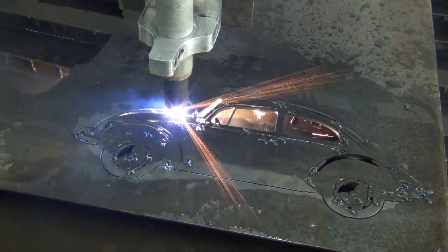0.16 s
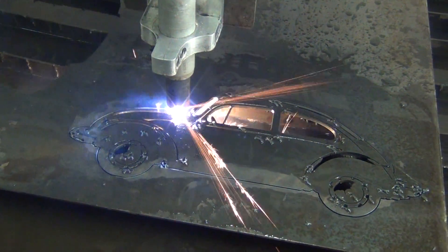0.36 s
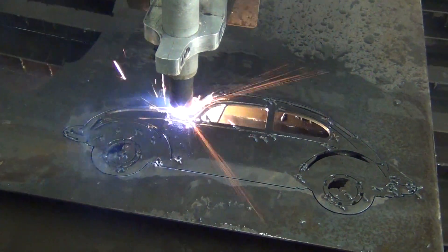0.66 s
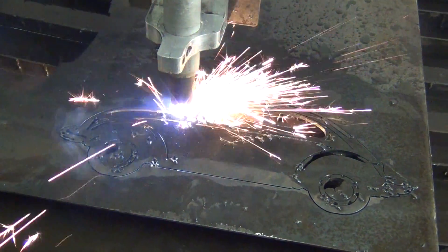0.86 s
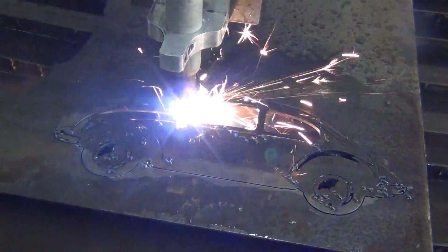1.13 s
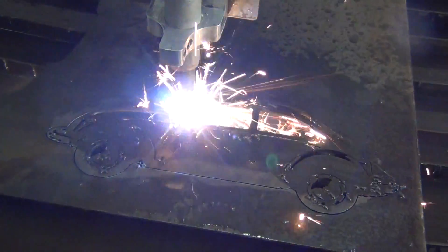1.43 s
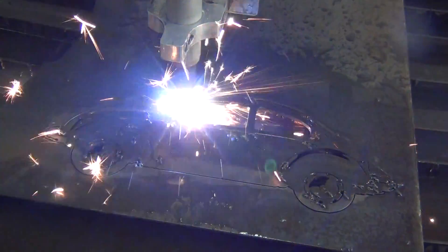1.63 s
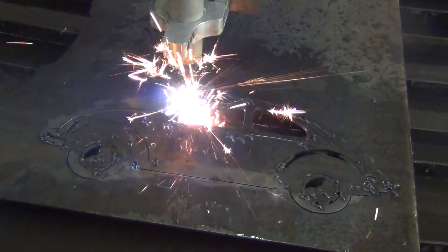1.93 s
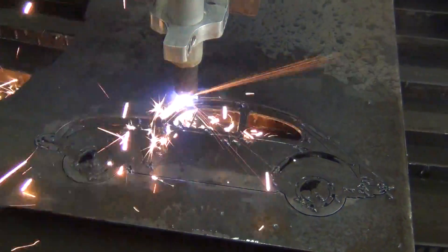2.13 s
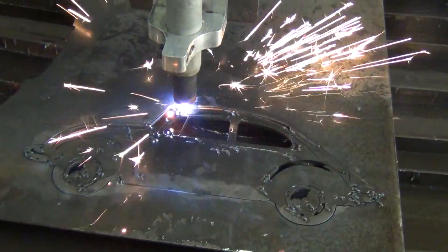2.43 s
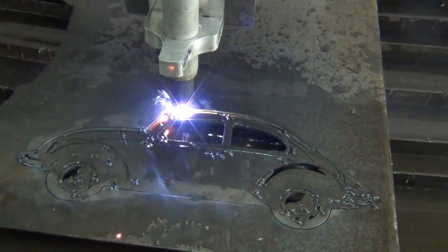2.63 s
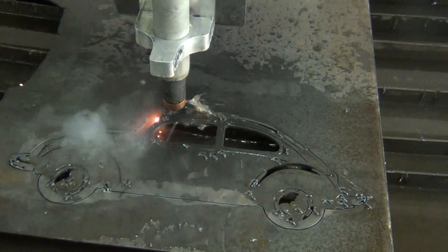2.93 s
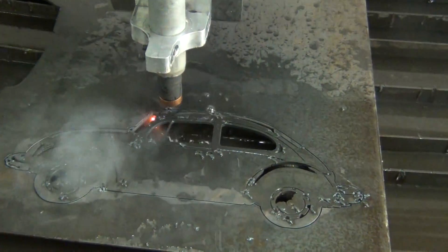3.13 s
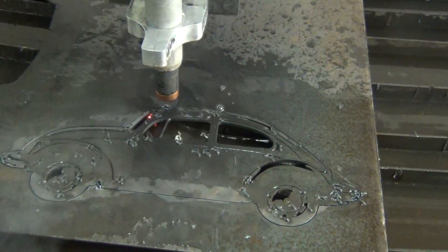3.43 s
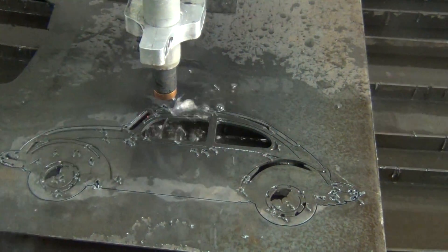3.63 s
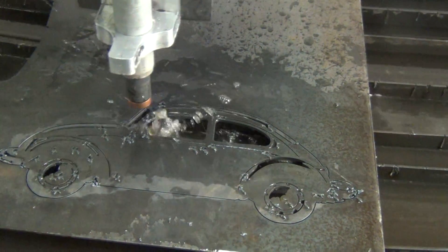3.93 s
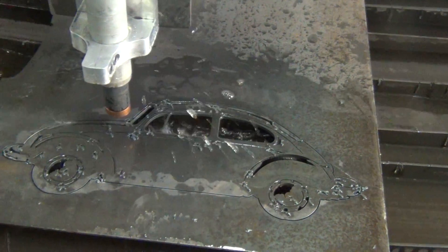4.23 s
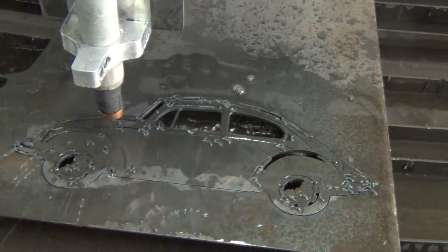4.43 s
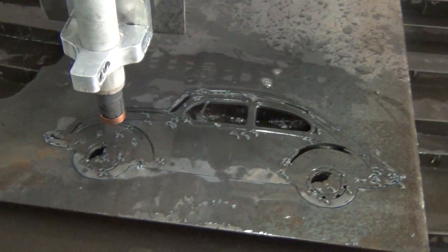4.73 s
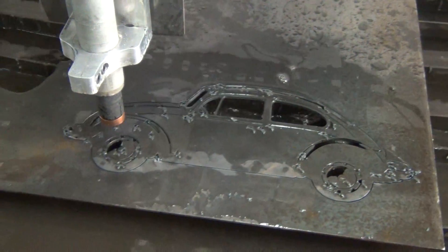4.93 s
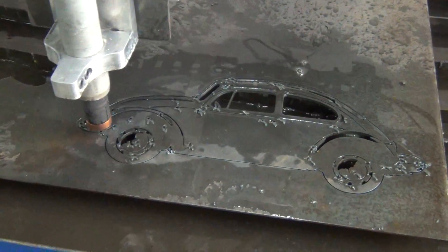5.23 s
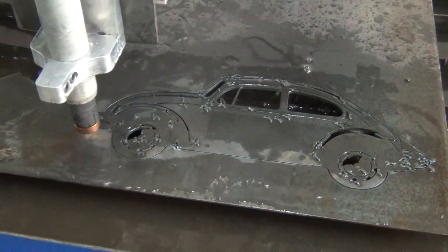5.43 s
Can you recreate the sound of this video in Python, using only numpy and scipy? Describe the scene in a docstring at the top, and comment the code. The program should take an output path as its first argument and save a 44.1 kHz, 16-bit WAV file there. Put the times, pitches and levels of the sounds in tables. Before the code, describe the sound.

Strong, high, turbulent hiss runs throughout. For the first two and a half seconds a grainy arc roar and spitting slag sit under it, growing rougher after one second. Wet gurgles, steam spurts and bubble gulps follow with a faint ringing of the plate. Then the roar drops out, a short electric whine lifts the torch, and the hiss travels over wet metal with a soft hollow hoot. Near microphones, two similar channels, low workshop hum.

```python
"""Plasma torch cutting steel over a water table

A workshop, heard in two nearly alike channels: an air jet, shaped noise with moving humps, hisses throughout.
The arc roars as noise ringing in kerf resonances; slag rasps and cracks; blown water rings in rising bubbles.
As the cut closes, gliding resonances gurgle and spurt, large bubbles gulp and the plate sings; pulses pop.
The arc stops, a stepper whines as it lifts the torch, and the gantry hums off with air still blowing on wet plate."""
import sys
import numpy as np
from scipy import signal
from scipy.fft import rfft, irfft, next_fast_len
from scipy.io import wavfile

SR = 44100
rng = np.random.default_rng(int(sys.argv[2]) if len(sys.argv) > 2 else 0)


def unload_audio(sound):
    """Save the sound as a 16-bit wav file, at the path given as the first command line argument."""
    columns = np.transpose(np.atleast_2d(sound))
    # keep every value between -1 and 1, then stretch to whole-number steps
    steps = np.round(np.clip(columns, -1, 1) * 32767)
    wavfile.write(sys.argv[1], SR, steps.astype(np.int16))


N = 245623
TIME = np.arange(N) / SR
FRAME = 512  # samples

# Levels are at the source, ahead of tank and channel filters. A "spread" is the standard deviation of a bell.

# Turbulent mixing noise of the jet, under its humps. Each row: frequency in Hz, level in dB per Hz.
MIXING = [(120, -82.5), (300, -96.5), (700, -88), (1500, -77.5), (2400, -73.5), (3000, -72), (3600, -72),
          (4400, -67.5), (6000, -61), (7500, -62.5), (9000, -64), (11000, -60.5), (13000, -62.5),
          (14500, -69.5)]
# Peaks and dips of the gap between torch and plate. Each row: centre in Hz, spread in Hz, change in dB.
GAP = [(2720, 60, 1.8), (3450, 210, 1.5), (3840, 76, 2), (4170, 66, -4), (4290, 116, 5), (5100, 70, -2.5),
       (5410, 112, 4), (5610, 138, -7.5), (5760, 71, 4.5), (6200, 61, 3), (6970, 90, -2), (9630, 99, -1.5),
       (10400, 210, -0.5), (12700, 170, -1), (15200, 300, -0.5)]
# Strength of the air jet. Each row: time in seconds, change in dB.
AIR = [(0, -1.5), (1.0, -1.4), (1.6, -1.3), (2.2, -2), (2.8, -0.8), (3.3, 1.65), (4.1, 0.25), (4.8, 0.5),
       (5.57, 0)]
# How strongly eddies stir each part of the hiss. Each row: frequency in Hz, rms swing in dB.
EDDIES = [(500, 3.5), (2500, 1.5), (4500, 1), (7000, 1.0), (10000, 0.28), (14000, 1.1)]
# The jet's broad humps, blowing into the kerf. Each row: centre in Hz, spread in Hz, height in dB.
HUMPS_IN_KERF = [(5110, 720, 4.5), (10120, 1015, 12), (13800, 520, 1.5), (15300, 350, -0.5)]
# The same humps, blowing from a height onto the plate. Each row: centre in Hz, spread in Hz, height in dB.
HUMPS_ON_PLATE = [(4450, 850, 3), (10590, 950, 7.5), (12400, 520, 3.5), (14950, 300, 0.5)]
# Dip from the plate's reflection. Each row: time in seconds, centre in Hz, depth in dB, spread in Hz.
REFLECTION = [(0, 7680, 8, 540), (1.0, 7700, 6.5, 540), (1.5, 7950, 7, 640), (1.9, 8450, 6.5, 720),
              (2.2, 7850, 8, 650), (2.5, 7400, 4, 600), (3.2, 6840, 7.5, 470), (3.6, 6400, 5.5, 520),
              (4.1, 5950, 4.5, 520), (4.6, 5900, 6.5, 450), (5.0, 6150, 5.5, 450), (5.57, 6400, 7.5, 398)]
# Parts of the hiss that swell or hollow out for a moment as the nozzle travels.
# Each row: middle in seconds, spread in seconds, centre in Hz, spread in Hz, change in dB.
SWELLS = [(1.25, 0.18, 13450, 250, 4), (1.5, .17, 15350, 350, 5), (1.98, 0.29, 11960, 450, 6.5),
          (2.22, .16, 15300, 450, 4), (2.78, 0.11, 4850, 250, -5), (3.05, .3, 15500, 300, -4.5),
          (3.2, 0.3, 10200, 280, -4), (3.2, .3, 9300, 250, 0.5), (3.45, 0.18, 2760, 200, -3.5),
          (4.25, .25, 14500, 300, -5), (4.95, .25, 13300, 160, 3.5), (5.1, .3, 14900, 220, 5),
          (5.55, 0.26, 12400, 800, -1)]
# Power supply and fans. Each row: pitch in Hz, level in dB, left minus right in dB.
HUM = [(65.4, -68.5, 7), (98.4, -64.5, 8), (119.2, -56, 3.5), (381.4, -64, 5)]
# Background rumble of the workshop. Each row: frequency in Hz, level in dB per Hz.
SHOP = [(20, -105), (40, -132), (62, -96), (80, -79), (115, -82.5), (150, -86), (240, -84), (420, -86),
        (1000, -107), (3000, -100)]
# Faint draught, opposite in the two channels. Each row: frequency in Hz, level in dB per Hz.
DRAUGHT = [(15, -79), (30, -77), (55, -77), (90, -83), (200, -87), (450, -93), (900, -104), (1500, -125)]
# Arc roaring in the kerf. Each row: time in seconds, level in dB before roar_db.
ARC = [(0, -34.5), (0.8, -33.5), (0.9, -35.5), (1.08, -34.5), (1.14, -31.5), (1.46, -32.5), (1.55, -30),
       (1.97, -31), (2.01, -33), (2.12, -40.5), (2.3, -43), (2.48, -38), (2.53, -35), (2.62, -31)]
# Kerf resonances. Each row: centre in Hz, width in Hz, relative level in dB, extra dB while the kerf runs clean.
KERF = [(637.6, 150, -10, 0), (1020, 133, -4.5, 1.5), (1433, 53, -10, -2), (1687, 240, -1, -1),
        (1866, 42, -6, -0.5), (2000, 190, -2, 0.5), (2610, 490, -4, 2)]
# Slag blown back out of the cut. Each row: peak in seconds, level in dB, spread in seconds.
BLOWBACK = [(1.14, -48, .06), (1.85, -35.5, 0.3), (2.164, -33, 0.06), (2.56, -35, 0.14)]
# Colour of the slag's coarse rasp. Each row: frequency in Hz, relative level in dB.
RASP = [(120, 14), (300, -3.5), (700, 5), (1300, -16), (2600, 3.5), (3400, 10), (4500, -18), (6500, 7),
        (10000, 2), (15000, -22)]
# Water churned by the jet. Each row: time in seconds, level in dB, typical bubble pitch in Hz.
CHURN = [(0, -49.5, 380), (2.1, -52, 397), (2.45, -41.5, 650), (2.85, -38, 704), (3.2, -44.5, 765),
         (3.72, -45.5, 676), (3.82, -46, 1350), (5.2, -46, 1420), (5.57, -67, 1300)]
# Loudest spurts of steam and water.
# Each row: start in seconds, level in dB before level_db, start pitch in Hz, end pitch in Hz, length in seconds.
SPURTS = [(1.122, -34.5, 460, 300, 0.022), (1.8, -27, 2650, 3040, 0.034), (1.871, -23, 1880, 1800, 0.018),
          (1.924, -22.5, 1953, 1576, 0.026), (1.967, -21.5, 1905, 1740, .016),
          (2.275, -27, 2750, 3270, 0.041), (2.382, -25, 2480, 3210, 0.023),
          (2.504, -19.5, 1960, 1730, 0.014), (2.54, -30, 3300, 3050, 0.024),
          (2.735, -28.5, 3230, 3400, 0.021), (2.792, -27, 890, 690, 0.011), (2.798, -25, 1670, 1490, 0.01),
          (2.82, -31, 1680, 1620, 0.015), (2.917, -33, 870, 640, 0.032), (3.04, -32, 1890, 2400, 0.026),
          (3.058, -33.5, 888, 724, 0.062), (3.18, -40, 1047, 705, 0.07), (3.46, -38, 987, 880, 0.05),
          (3.523, -35.5, 1770, 1250, 0.049), (3.69, -38, 650, 1050, 0.049),
          (3.792, -33.5, 1682, 1375, 0.03), (3.89, -38, 1414, 1555, 0.042),
          (3.975, -32.5, 1500, 1756, 0.035), (4.008, -32, 1656, 1404, 0.031),
          (4.28, -42, 1596, 1250, 0.042)]
# Steam pops. Each row: middle in seconds, peak in dB, time from middle to peak in seconds.
POPS = [(1.9353, -14, 0.000073), (2.7473, -18, 0.00021), (2.8018, -12, 0.00028)]
# Ringing modes of the plate. Each row: centre in Hz, width in Hz, relative level in dB.
PLATE = [(325, 56, -9.5), (456, 15, -7.5), (640, 46, -2.5), (1696, 89, 0), (3120, 82, -4)]
# Gas pocket shrinking and swelling under the closing cut. Each row: time in seconds, pitch in Hz, level in dB.
GURGLE = [(2.31, 1750, -55), (2.323, 1730, -32), (2.37, 1750, -42), (2.412, 2150, -43), (2.432, 1895, -28),
          (2.446, 1700, -26.5), (2.462, 2130, -32), (2.48, 2330, -31.5), (2.51, 2470, -37),
          (2.59, 2400, -47), (2.63, 2600, -38), (2.652, 1578, -30), (2.668, 749, -28), (2.7, 600, -43),
          (2.712, 1900, -44), (2.725, 1950, -32), (2.748, 1360, -35), (2.76, 1000, -45), (2.79, 850, -48)]
# Single large bubbles. Each row: start in seconds, peak in dB, pitch in Hz, swell time in seconds.
GULPS = [(2.541, -29.5, 1180, .005), (2.591, -26.5, 650, .003), (2.657, -22, 1010, 0.0023),
         (2.663, -19, 652, 0.0029), (2.675, -20, 947, 0.0021), (2.683, -28, 422, .004),
         (2.746, -22.5, 621, 0.0024), (2.764, -32, 900, 0.0034), (2.783, -25, 657, 0.0024),
         (2.8, -23.5, 720, .0025), (2.803, -26, 305, 0.0045), (2.81, -20, 510, 0.0026),
         (2.819, -26.5, 420, .003), (2.929, -30.5, 618, 0.0037), (3.5, -37, 323, 0.0043),
         (3.645, -41, 720, 0.0074), (3.693, -39, 334, 0.0038), (3.795, -32.5, 1830, .005),
         (3.798, -33, 2060, 0.0046), (4.036, -35, 717, 0.0067)]
# Surges of the stepper's whine. Each row: start in seconds, end in seconds, level in dB.
SURGES = [(3.04, 3.13, -41), (3.146, 3.276, -42), (3.322, 3.424, -40)]
# Gantry motors. Each row: pitch in Hz, level in dB, start in seconds.
GANTRY = [(197, -64, 3.5), (232, -61.5, 3.45), (474, -63, 3.64), (730, -62, 4.7)]
# Resonances and dips of the slatted water table. Each row: centre in Hz, spread in Hz, change in dB.
TANK = [(235, 31, -1.5), (322, 23, 1), (400, 25, 0), (554, 108, -5), (623, 18, 3), (1008, 31, -0.5),
        (1600, 55, 2.5), (1800, 32, -1.5), (3160, 41, 3), (4370, 83, 10)]
# How the two channels differ.
# Each row: frequency in Hz, left minus right in dB, lead of the left in radians, likeness from 0 to 1.
STEREO = [(60, 3, 0, .4), (130, 2.5, 0, .65), (280, -1, 0, .87), (450, -3.3, 0, .84), (660, -.8, 0, .965),
          (950, -.3, 0, .982), (1250, 0, 0, .9993), (4600, 0, 0, .9995), (5600, .6, .09, .985),
          (6600, .4, .14, .97), (7700, 2.5, .5, .83), (8450, 6, .4, .65), (9000, 4.8, -.4, .85),
          (9900, 1, -.24, .985), (11200, .5, -.08, .996), (12300, .1, 0, .998), (14500, .1, 0, .992)]
CUTOFF_HZ = 15800

CUT_THROUGH_S = 2.1  # the cut closes
THROUGH_TOP_HZ, THROUGH_TOP_DB = 250, 2.5  # the third hump then rises in pitch and level
LEAVE_KERF_S, LEAVE_TAKES_S = 3.1, 0.26  # middle and time constant of the nozzle leaving the kerf
LIFT_SAG_HZ, LIFT_SAG_DB, LIFT_SAG_SPREAD_S = 520, 1, 0.19  # the main hump sags while the torch rises
OUTSKIRTS_S, OUTSKIRTS_LOSS_DB_PER_S = 4.82, 5.5  # the low hump fades near the end of the plate
# the lifted jet atomises water, a high hiss that sinks in pitch
SPRAY_S, SPRAY_SPREAD_S, SPRAY_DB = 3.53, 0.8, 2.5
SPRAY_HZ, SPRAY_WIDTH_HZ, SPRAY_SINK_HZ_PER_S = 12600, 550, 1300
ARC_OUT_S, ARC_FADE_DB_PER_S = 2.58, 63
CHOKE_S, CHOKE_TAKES_S = 1.11, 0.025  # slag begins to choke the kerf
SLAG_STEADY_DB = -46.5  # between bursts, while the arc burns
# smaller spurts at random after the cut closes, weakening and tending lower
SPUTTER_FROM_S, SPUTTER_TO_S, SPUTTER_LENGTH_S = 2.36, 3.75, 0.0254
SPUTTER_DB, SPUTTER_FADE_DB_PER_S = -33, 5.5  # before level_db of the spurts
SPUTTER_FIRST_HZ, SPUTTER_LAST_HZ, SPUTTER_SINK_S = 2356, 745, 0.4
SINGING_FROM_S, SINGING_TO_S, SINGING_EDGE_S, SINGING_DB = 2.01, 3.16, 0.32, -45
# the torch lift: middle and half length of the full-speed run, top step rate, ramp
LIFT_S, LIFT_HALF_S, STEP_HZ, RAMP_HZ_PER_S = 3.228, 0.182, 1347, 6000
SURGE_EDGE_S, WHINE_DB = 0.02, -54  # the whine is faint between its surges
RAMP_DB, RAMP_LOSS_DB_PER_S = -48, 100  # and fades away from the run along both ramps
# the carriage shudders with the lift and settles
SHUDDER_S, SHUDDER_RISE_S, SHUDDER_DB, SHUDDER_FADE_DB_PER_S, CARRIAGE_HZ = 3.05, 0.097, -42.5, 27, 63
# the hoot of the hollow under the cut-outs is loudest over their middle and sinks as the nozzle moves on
HOLLOW_FROM_S, HOLLOW_PEAK_S, HOLLOW_SPREAD_S = 3.4, 5.12, 0.41
HOOT_DB, HOOT_HZ, HOOT_SINK_HZ_PER_S = -47, 722, 98


def from_db(db):
    """Decibels to gain."""
    return 10 ** (np.asarray(db) / 20)


def rms_one(x):
    """Scale to unit power."""
    return x / np.sqrt(np.mean(np.abs(x) ** 2) + 1e-20)


def in_time(rows, at=TIME):
    """Each column of a curve, joined by straight lines."""
    s, *columns = np.transpose(rows)
    return [np.interp(at, s, column) for column in columns]


def at_hz(rows, hz):
    """Each column of a spectrum, joined on a log-frequency axis."""
    points, *columns = np.transpose(rows)
    return [np.interp(np.log(hz + 1), np.log(points), column) for column in columns]


def hump(x, centre, spread):
    """A bell of height 1, in frequency or in time."""
    return np.exp(-0.5 * ((x - centre) / spread) ** 2)


def gate(start_s, end_s, edge_s):
    """Rise, hold at 1, fall."""
    return np.clip(np.minimum(TIME - start_s, end_s - TIME) / edge_s, 0, 1)


def drift(rate, count=N):
    """Smooth random wandering of spread 1, up to about `rate` changes a second."""
    hz = np.fft.rfftfreq(next_fast_len(count + SR // 10), 1 / SR)
    spectrum = rfft(rng.standard_normal(2 * len(hz) - 2)) / (1 + (hz / rate) ** 2)
    return rms_one(irfft(spectrum))[:count]


def resonance(hz, width_hz, count=N):
    """Turbulence ringing in one resonance, whose centre may glide; rms about 1."""
    phase = 2 * np.pi * np.cumsum(hz * np.ones(count)) / SR
    in_phase = drift(width_hz * 0.65, count) * np.cos(phase)
    return in_phase + drift(width_hz * 1.24, count) * np.sin(phase)


def tone(hz, waver_hz=0.68):
    """A machine line that wavers slightly in pitch; rms 1."""
    return np.sqrt(2) * np.sin(2 * np.pi * np.cumsum(hz + waver_hz * drift(6.9)) / SR)


def coloured(x, spectrum):
    """Give unit white noise a spectrum in dB per Hz."""
    size = next_fast_len(N + FRAME)
    gain = from_db(at_hz(spectrum, np.fft.rfftfreq(size, 1 / SR))[0])
    return irfft(rfft(x, size) * gain, size)[..., :N] * np.sqrt(SR / 2)


def jet_humps(s, closing_s=0.15):
    """Jet humps over time (Hz, spread Hz, dB), moved by the closing cut, rising torch and travelling nozzle."""
    away = 0.5 + 0.5 * np.tanh((s - LEAVE_KERF_S) / (2 * LEAVE_TAKES_S))
    through = (0.5 + 0.5 * np.tanh((s - CUT_THROUGH_S) / closing_s)) * (1 - away)
    rising = hump(s, LIFT_S, LIFT_SAG_SPREAD_S)
    in_kerf = np.multiply.outer(HUMPS_IN_KERF, 1 - away)
    low, main, top, highest = in_kerf + np.multiply.outer(HUMPS_ON_PLATE, away)
    low = (low[0], low[1], low[2] - OUTSKIRTS_LOSS_DB_PER_S * np.maximum(s - OUTSKIRTS_S, 0))
    main = (main[0] - LIFT_SAG_HZ * rising, main[1], main[2] - LIFT_SAG_DB * rising)
    top = (top[0] + THROUGH_TOP_HZ * through, top[1], top[2] + THROUGH_TOP_DB * through)
    spray_hz = SPRAY_HZ - SPRAY_SINK_HZ_PER_S * (s - SPRAY_S)
    spray = (spray_hz, SPRAY_WIDTH_HZ, SPRAY_DB * hump(s, SPRAY_S, SPRAY_SPREAD_S))
    swells = [(hz, width, db * hump(s, when, spread)) for when, spread, hz, width, db in SWELLS]
    return [low, main, top, highest, spray, *swells]


def air_jet(flutter_db=0.53, surge_db=0.49):
    """Jet turbulence: noise with moving humps and the plate's reflection dip; a direct and a scattered part."""
    hz, s, noise = signal.stft(rng.standard_normal((2, N)), SR, nperseg=FRAME)
    hz = hz[:, None]
    db = at_hz(MIXING, hz)[0] + in_time(AIR, s)[0]
    db = db + sum(height * hump(hz, centre, spread) for centre, spread, height in [*GAP, *jet_humps(s)])
    dip_hz, dip_db, dip_spread_hz = in_time(REFLECTION, s)
    db = db - dip_db * hump(hz, dip_hz, dip_spread_hz)
    # eddies make neighbouring parts of the spectrum swell on their own
    patch = np.outer(np.hanning(17), np.hanning(11))
    eddies = rms_one(signal.fftconvolve(rng.standard_normal(db.shape), patch, "same"))
    stirred = noise * from_db(db + at_hz(EDDIES, hz)[0] * eddies)
    hiss = signal.istft(stirred, SR, nperseg=FRAME)[1][:, :N] * np.sqrt(SR / 2)
    return hiss * from_db(flutter_db * drift(340) + surge_db * drift(31))


def workshop_hum():
    """Supply and fans hum on steady lines whose levels wander."""
    sides = np.array([[0.5], [-0.5]])
    return sum(from_db(db + drift(1.6) + sides * pan) * tone(hz, waver_hz=0.56) for hz, db, pan in HUM)


def workshop_rumble():
    """Shaped background noise of the room, as a direct and a scattered part."""
    return coloured(rng.standard_normal((2, N)), SHOP)


def draught():
    """Faint air movement, low noise that pushes in one channel while it pulls in the other."""
    return coloured(rng.standard_normal(N), DRAUGHT) * np.array([[1], [-1]])


def arc_dying_db():
    """Change of level once the current is cut."""
    return -ARC_FADE_DB_PER_S * np.maximum(TIME - ARC_OUT_S, 0)


def slag_flow():
    """Gain of the blown-back slag: a steady trickle while the arc burns and a few swelling bursts."""
    bursts = sum((from_db(db) * hump(TIME, s, spread)) ** 2 for s, db, spread in BLOWBACK)
    return np.sqrt(bursts + from_db(SLAG_STEADY_DB + arc_dying_db()) ** 2)


def arc(roar_db=-3.0, rough_db=1.5, surge_db=0.77, rasp_rough_db=3.0, spit_db=4.0):
    """Melt leaves the kerf in uneven gobs, chopping the resonant roar and the slag's spitting rasp."""
    gobs = drift(116)
    clean = 0.5 - 0.5 * np.tanh((TIME - CHOKE_S) / CHOKE_TAKES_S)
    roar = sum(from_db(db + extra * clean) * resonance(hz, width) for hz, width, db, extra in KERF)
    level_db = in_time(ARC)[0] + roar_db + surge_db * drift(36) + arc_dying_db()
    roar = roar * rms_one(from_db(rough_db * gobs)) * from_db(level_db)
    chopped = rng.standard_normal(N) * from_db(rasp_rough_db * gobs + spit_db * drift(23))
    return roar + rms_one(coloured(chopped, RASP)) * slag_flow()


def sparks(per_s=220, size_db=5.5, spark_db=17.5, low_hz=1800, high_hz=9000):
    """Drops of molten steel burst with tiny cracks, louder as more slag blows back."""
    sizes = from_db(size_db * np.minimum(rng.exponential(1, N), 3)) * rng.choice([-1, 1], N)
    cracks = sizes * (rng.random(N) < per_s / SR) * slag_flow() * from_db(spark_db)
    band = signal.butter(2, [low_hz, high_hz], "band", fs=SR, output="sos")
    return signal.sosfilt(band, cracks + 1e-18)


def bubbles(per_s=640, cycles=13, spread_octaves=0.7, size_db=3.5, rise=0.082):
    """Bubbles burst at random in the blown water, each a short ring that rises in pitch."""
    out, count = np.zeros(N + SR), int(per_s * N / SR)
    draws = rng.random((4000, 3))[:count]
    starts = draws[:, 0] * N / SR
    logistic = np.log(draws[:, 1] / (1 - draws[:, 1])).clip(-4, 4)
    pitches = in_time(CHURN, starts)[1] * 2 ** (spread_octaves * logistic / 2)
    sizes = from_db(size_db * np.minimum(-np.log(draws[:, 2]), 3))
    for s, hz, size in zip(starts, pitches, sizes):
        turns = np.arange(int(cycles / hz * SR)) * hz / SR
        ring = np.sin(2 * np.pi * turns * (1 + rise * turns / cycles)) * from_db(-60 * turns / cycles)
        out[int(s * SR):int(s * SR) + len(ring)] += size * np.sqrt(hz) * ring
    return rms_one(out[:N]) * from_db(in_time(CHURN)[0])


def sputter(count=24, spread_octaves=0.4, fall_octaves=0.14):
    """Rows of small spurts at random, crowded at first and thinning out."""
    when, pitch = rng.uniform(-0.8, 1, (count, 2)).T
    age = (SPUTTER_TO_S - SPUTTER_FROM_S) * ((np.arange(count) + 0.5 + when / 2) / count) ** 2
    typical_hz = SPUTTER_LAST_HZ + (SPUTTER_FIRST_HZ - SPUTTER_LAST_HZ) * np.exp(-age / SPUTTER_SINK_S)
    start_hz = typical_hz * 2 ** (spread_octaves * pitch)
    end_hz = start_hz * 2 ** -fall_octaves
    db = SPUTTER_DB - SPUTTER_FADE_DB_PER_S * age
    return [(SPUTTER_FROM_S + a, d, f, e, SPUTTER_LENGTH_S) for a, d, f, e in zip(age, db, start_hz, end_hz)]


def spurts(width_share=0.25, level_db=-4.0):
    """A steam pocket opens under the plate: a short breathy note that glides with its size."""
    out = np.zeros(N + SR)
    for s, db, start_hz, end_hz, length in [*SPURTS, *sputter()]:
        count = int(length * SR) + 2
        swell = np.sin(np.pi * np.linspace(0, 1, count)).clip(0) ** 0.5
        glide = np.geomspace(start_hz, end_hz, count)
        note = rms_one(resonance(glide, width_share * start_hz, count))
        out[int(s * SR):int(s * SR) + count] += from_db(db + level_db) * swell * note
    return out[:N]


def pops():
    """A pocket of steam bursts: one push and one pull of pressure."""
    return sum(-from_db(db) * (TIME - s) / width * np.sqrt(np.e) * hump(TIME, s, width)
               for s, db, width in POPS)


def singing_plate(flicker_db=2.0):
    """The jet keeps a few narrow modes of the plate ringing."""
    level = from_db(SINGING_DB + flicker_db * drift(12)) * gate(SINGING_FROM_S, SINGING_TO_S, SINGING_EDGE_S)
    return level * sum(from_db(db) * resonance(hz, width) for hz, width, db in PLATE)


def gurgle(width_hz=170, evenness=0.81, chop_db=1.0, edge_s=0.008):
    """The jet drives the gas pocket without a break: one gliding resonance, chopped by the water."""
    hz, db = in_time(GURGLE)
    note = resonance(hz, width_hz)
    envelope = np.abs(signal.hilbert(note, next_fast_len(N))[:N])
    note = rms_one(note / (envelope + 0.1) ** evenness)  # evens out its own swells
    return note * from_db(db + chop_db * drift(130)) * gate(GURGLE[0][0], GURGLE[-1][0], edge_s)


def gulps(rise_per_s=2.4):
    """A large bubble breaks free: a quick swell and a short ring that rises a little."""
    out, t = np.zeros(N + SR), TIME[:SR // 10]
    for s, db, hz, swell in GULPS:
        envelope = t / swell * np.exp(1 - t / swell)
        ring = envelope * np.sin(2 * np.pi * hz * t * (1 + rise_per_s * t / 2))
        out[int(s * SR):int(s * SR) + len(t)] += from_db(db) * ring
    return out[:N]


def motors(ramp_s=0.11):
    """The lift stepper ramps up, runs in surges and brakes; the carriage shudders; the gantry sets off."""
    ramping = np.maximum(np.abs(TIME - LIFT_S) - LIFT_HALF_S, 0)  # seconds outside the full-speed run
    surges = sum(from_db(db) * gate(start, end, SURGE_EDGE_S) for start, end, db in SURGES)
    step_hz = np.maximum(STEP_HZ - RAMP_HZ_PER_S * ramping, 0)
    faint = from_db(np.where(ramping > 0, RAMP_DB - RAMP_LOSS_DB_PER_S * ramping, WHINE_DB))
    lift = np.maximum(surges, faint) * tone(step_hz, waver_hz=2.94)
    age = np.maximum(TIME - SHUDDER_S, 0)
    shudder_level = np.minimum(age / SHUDDER_RISE_S, 1) * from_db(SHUDDER_DB - SHUDDER_FADE_DB_PER_S * age)
    shudder = shudder_level * tone(CARRIAGE_HZ)
    gantry = sum(from_db(db + 2 * drift(1.7)) * tone(hz) * np.clip((TIME - s) / ramp_s, 0, 1)
                 for hz, db, s in GANTRY)
    return lift + shudder + gantry


def hollow(width_hz=115, edge_hz=3830, edge_width_hz=200, edge_db=-43, rise_s=0.61):
    """Moving over the plate, the jet blows across the cut-outs: a low hoot and a breathy edge whistle."""
    hoot_hz = HOOT_HZ - HOOT_SINK_HZ_PER_S * (TIME - HOLLOW_PEAK_S)
    hoot = from_db(HOOT_DB) * hump(TIME, HOLLOW_PEAK_S, HOLLOW_SPREAD_S) * resonance(hoot_hz, width_hz)
    crossing = np.clip((TIME - HOLLOW_FROM_S) / rise_s, 0, 1)
    return hoot + from_db(edge_db) * crossing * resonance(edge_hz, edge_width_hz)


def table_echoes(x, t60=0.038):
    """Slats, tank and gantry return a short, dense spray of echoes of unit total energy."""
    t = TIME[:SR // 3]
    tail = rng.standard_normal(len(t)) * (rng.random(len(t)) < 0.03) * (t > 0.002) * from_db(-60 * t / t60)
    return signal.fftconvolve(x, tail / np.linalg.norm(tail))[:N]


def in_tank(x, lowest_hz=200):
    """What sounds at the plate takes on the tank's resonances and radiates little bass."""
    size = next_fast_len(N + SR // 5)
    hz = np.fft.rfftfreq(size, 1 / SR)
    colour = from_db(sum(db * hump(hz, centre, spread) for centre, spread, db in TANK))
    resonant = irfft(rfft(x, size) * colour, size)[:N]
    return signal.sosfilt(signal.butter(3, lowest_hz, "high", fs=SR, output="sos"), resonant)


def wall_echoes(x, count=14, echo_db=-13.5, dull_hz=5500):
    """Faint dull returns from gantry, floor and walls lay a fine fixed ripple over the hiss."""
    lags = (rng.uniform(0.003, 0.02, count) * SR).astype(int)
    echoes = sum(np.pad(x, (lag, 0))[:N] for lag in lags) / np.sqrt(count)
    return x + from_db(echo_db) * signal.sosfilt(signal.butter(3, dull_hz, fs=SR, output="sos"), echoes)


def two_channels(direct, scattered):
    """The two channels are almost alike from 1 to 5 kHz, and differ in the bass and around 8 kHz."""
    size = next_fast_len(N + FRAME)
    pan_db, lead, alike = at_hz(STEREO, np.fft.rfftfreq(size, 1 / SR))
    alike, sides = np.clip(alike, 0, 1), np.array([[1], [-1]])
    shared = rfft(direct, size) * np.sqrt((1 + alike) / 2)
    opposed = sides * rfft(scattered, size) * np.sqrt((1 - alike) / 2)
    channel_gain = from_db(sides * pan_db / 2) * np.exp(0.5j * sides * lead)
    return irfft((shared + opposed) * channel_gain, size)[:, :N]


def scene(echo_db=-8.0):
    """Jet, arc, water and machine in the workshop, in two channels."""
    hiss, scattered_hiss = air_jet()
    rumble, scattered_rumble = workshop_rumble()
    splash = bubbles() + spurts() + gurgle() + gulps() + pops() + sparks()
    cut = in_tank(arc() + splash + from_db(echo_db) * table_echoes(splash)) + singing_plate()
    direct = wall_echoes(hiss) + cut + hollow() + motors() + rumble
    # a high-pass keeps deep bass out of the direct sound
    direct = signal.sosfilt(signal.butter(3, 45, "high", fs=SR, output="sos"), direct)
    return two_channels(direct, scattered_hiss + scattered_rumble) + workshop_hum() + draught()


def record(dry):
    """Both channels end in a steep treble cut."""
    return signal.fftconvolve(dry, signal.firwin(801, CUTOFF_HZ, fs=SR)[None], "same", axes=1)


dry = scene()
out = record(dry)
unload_audio(out)
```